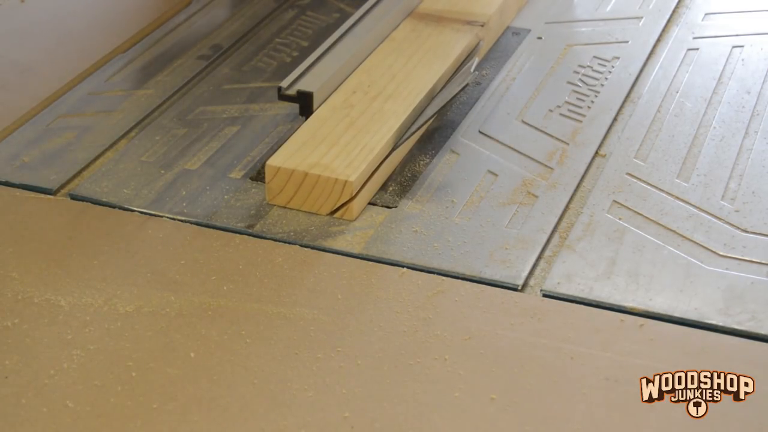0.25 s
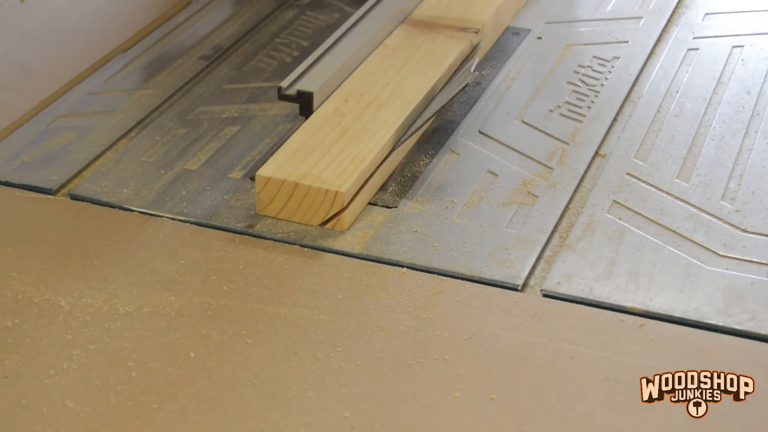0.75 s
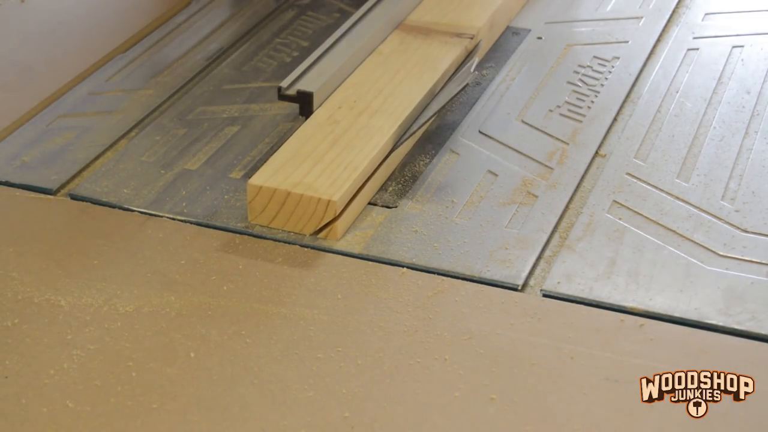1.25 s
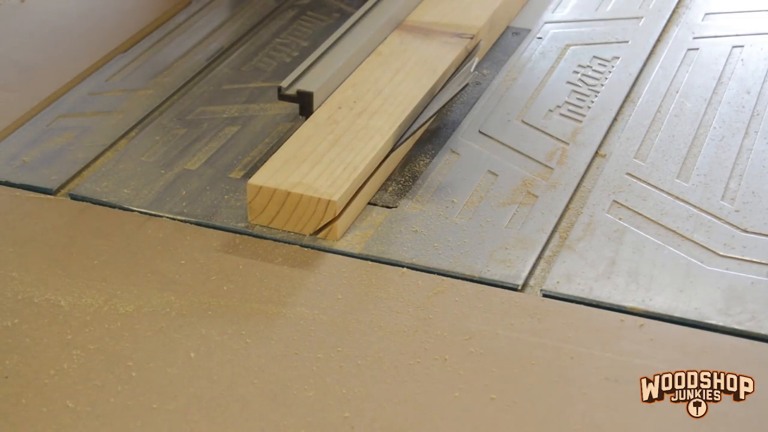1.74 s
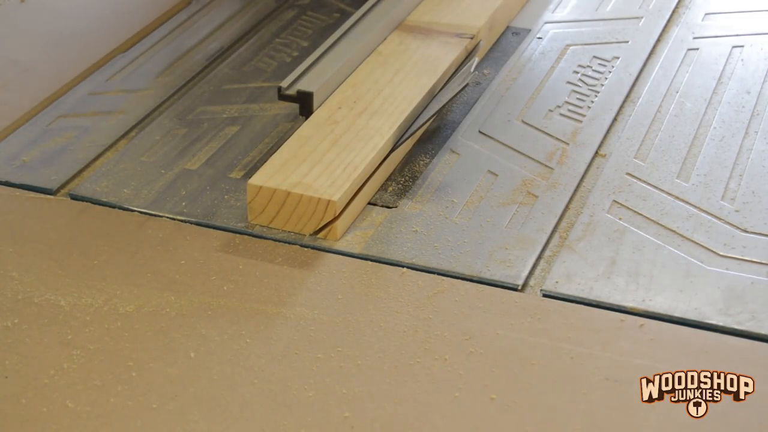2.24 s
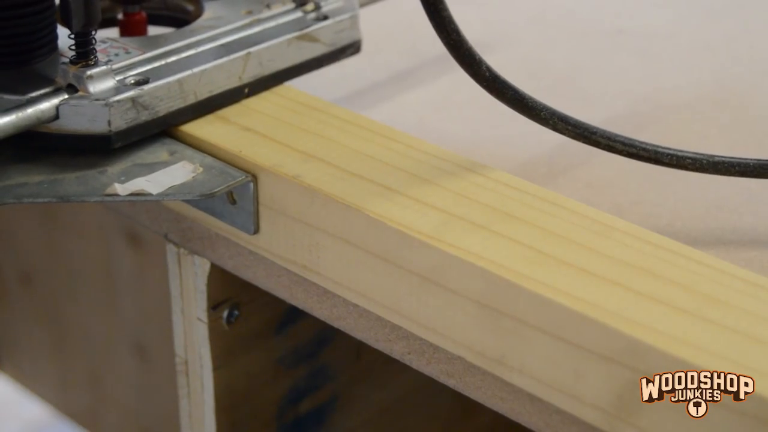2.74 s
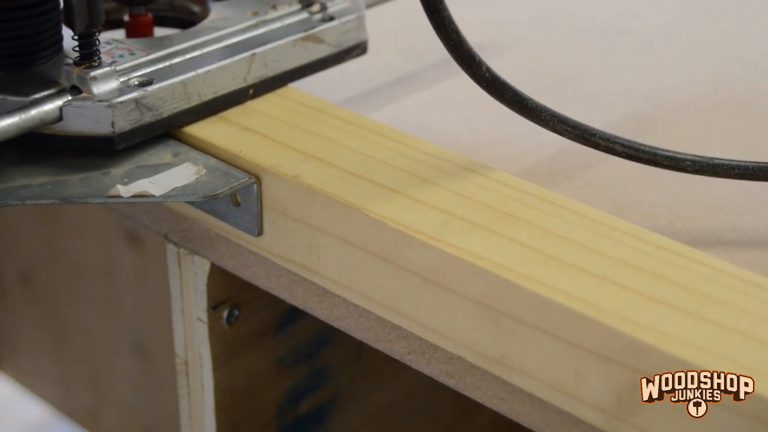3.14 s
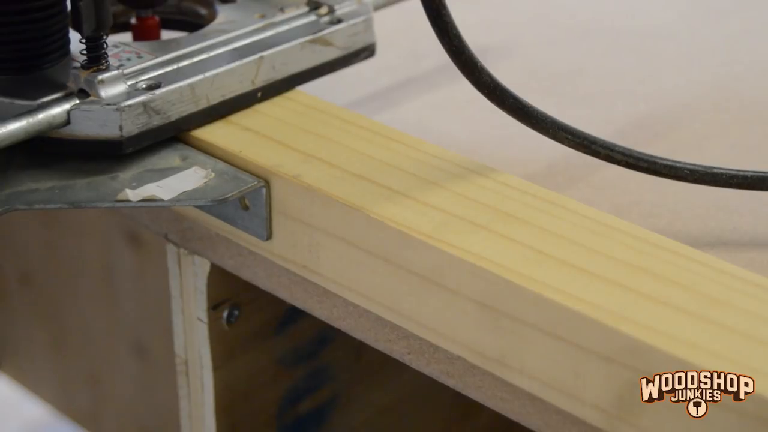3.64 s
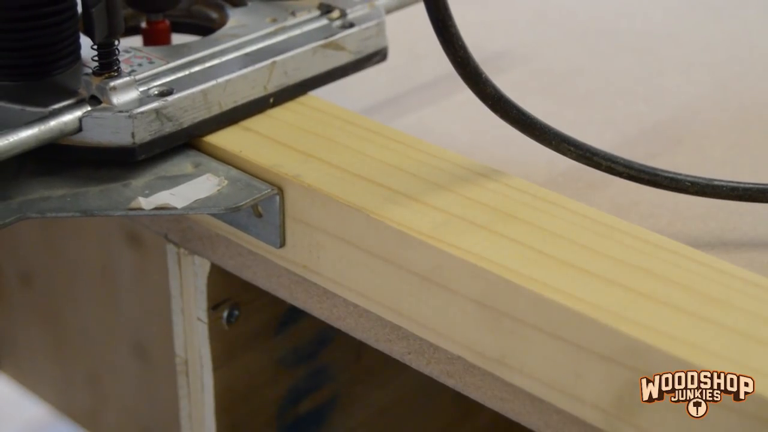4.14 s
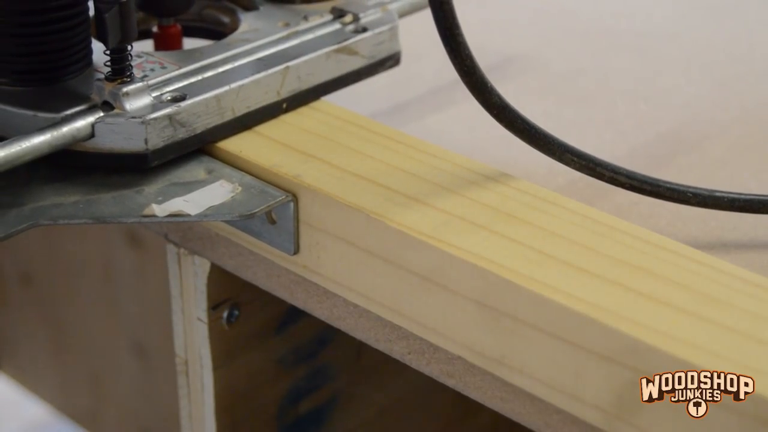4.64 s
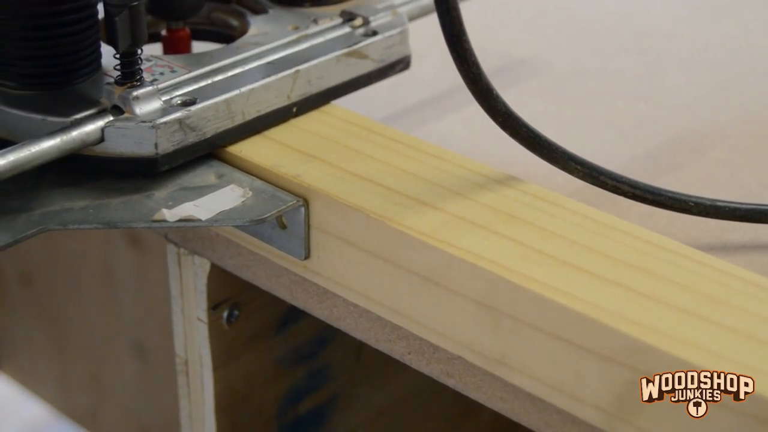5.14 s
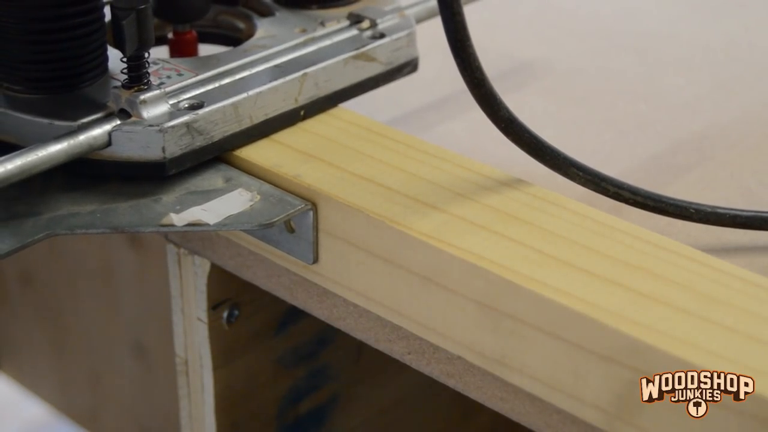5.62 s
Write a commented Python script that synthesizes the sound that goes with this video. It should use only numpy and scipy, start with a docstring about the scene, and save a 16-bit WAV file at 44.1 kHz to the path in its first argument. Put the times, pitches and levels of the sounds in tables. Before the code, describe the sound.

Close, harsh table-saw cutting noise rises in pitch, then cuts to a coasting router that kicks up, sags and climbs to a steady whine.

```python
"""Workshop, close by, mono: a table saw rips a pine board and speeds up as the cut ends; a quick
crossfade leads to a hand router that coasts, is kicked up, sags, then climbs to full speed.
Saw: tooth whine, blade and motor orders and rings over rumble, cutting rush, dust and grit.
Router: shaft orders, surge growl and housing tones over body rumble, fan air and brush hiss."""
import sys
import numpy as np
from scipy import signal
from scipy.fft import rfft, irfft
from scipy.io import wavfile
from scipy.ndimage import uniform_filter1d

SR = 44100
rng = np.random.default_rng(int(sys.argv[2]) if len(sys.argv) > 2 else 0)


def generate_wav(signal):
    """Clip the signal to [-1, 1] and save it as 16-bit WAV at the path in sys.argv[1]."""
    frames = np.transpose(np.atleast_2d(signal))
    scaled = np.clip(frames, -1, 1) * 32767
    pcm = np.round(scaled).astype(np.int16)
    wavfile.write(sys.argv[1], SR, pcm)


N = 259308
T = np.arange(N) / SR

EDIT_S = 2.318  # saw gives way to router
TOOTH_COUNT = 40
CUT_ENDS_S = 1.5  # blade is out of the board
HOUSING_HZ = 2190  # router housing resonance
TOP_HZ = 15760

# router power comes on: (start [s], rise [s], hold [s], fall [s], strength [0-1])
POWER_SURGES = [(2.5, 0.036, 0.1, 0.24, 0.8), (3.0, 0.073, 0.046, 0.43, 0.51)]
POWER_ON_S = POWER_SURGES[0][0]


def undb(db):
    """Decibels to gain."""
    return 10 ** (np.asarray(db) / 20)


def columns(table):
    """Each column of a curve table, interpolated to one value per sample."""
    time_s, *cols = np.transpose(table)
    return [np.interp(T, time_s, col) for col in cols]


def walk(rate_hz):
    """Random levels held 1 / rate_hz s and slewed twice; spread near 1."""
    k = int(SR / rate_hz)
    steps = np.repeat(rng.standard_normal(N // k + 1), k)
    return 1.33 * uniform_filter1d(uniform_filter1d(steps, k), k)[:N]


def swell(peak_s, rise_s, fall_s, hold_s=0):
    """Linear 0 to 1 to 0, reaching 1 at peak_s and holding for hold_s."""
    hold_end_s = peak_s + hold_s
    return np.interp(T, [peak_s - rise_s, peak_s, hold_end_s + 1e-4, hold_end_s + fall_s], [0, 1, 1, 0])


def noise(shape, ripple_db=0):
    """Noise of rms 1 with a (Hz, dB) colour; the room adds a fixed fine ripple over frequency."""
    shape_hz, shape_db = np.transpose(shape)
    bin_hz = np.maximum(np.fft.rfftfreq(N, 1 / SR), 1)
    steps = np.repeat(rng.standard_normal(len(bin_hz) // 400 + 1), 400)
    ripple = uniform_filter1d(steps, 400)[:len(bin_hz)]
    colour_db = np.interp(np.log(bin_hz), np.log(shape_hz), shape_db) + ripple_db * ripple
    x = irfft(rfft(rng.standard_normal(N)) * undb(colour_db), N)
    return x / np.std(x)


def turns(hz):
    """Shaft angle in radians, the running sum of its speed."""
    return 2 * np.pi * np.cumsum(hz) / SR


def tone(angle, db, waver_db, rate_hz):
    """Sine partial of nominal rms db; one random walk wavers its level and, time-shifted, its phase."""
    wander = waver_db * walk(rate_hz)
    return np.sqrt(2) * undb(db + wander) * np.sin(angle + np.roll(wander, N // 3) / 5)


def saw_speed():
    """Tooth rate in Hz and whine level in dB: the blade speeds up as the load goes."""
    # saw blade: (time [s], tooth rate [Hz], tooth whine [dB])
    blade_speed = [(0, 2595, -33.5), (.35, 2595, -35), (.55, 2593, -38), (.7, 2592, -34), (.9, 2589, -36.5),
                   (1.1, 2592, -30.5), (1.2, 2598, -32), (1.4, 2643, -35), (1.52, 2683, -42),
                   (1.6, 2699, -39), (1.7, 2704, -35.5), (1.82, 2749, -47.5), (2.0, 2792, -41.5),
                   (2.31, 2839, -38.5)]
    return columns(blade_speed)


def saw_rumble(stages_s):
    """Low-frequency noise, lifted where the board thuds on the table."""
    # noise colour: (frequency [Hz], density [dB per Hz])
    rumble_shape = [(15, -67), (25, -50), (54, -37), (97, -14), (124, -0.5), (188, 2), (227, -5),
                    (322, -5.5), (500, -4), (650, -43), (1100, -120)]
    # board thuds: (time [s], lift over the rumble [dB])
    thuds = [(.5, 3.5), (1.0, 8.2), (1.36, 5.6), (1.63, 5)]
    thud_s = 0.16
    level_db = np.interp(T, stages_s, [-47.5, -53.5, -53.5, -52.5])
    level_db = level_db + sum(lift_db * swell(s, thud_s, thud_s) for s, lift_db in thuds)
    return undb(level_db) * noise(rumble_shape)


def saw_spray(stages_s, blade):
    """Cutting rush, dust hiss and grit as coloured noise, throbbed slightly once a turn by blade wobble."""
    # noise colours: (frequency [Hz], density [dB per Hz])
    rush_shape = [(120, -38), (200, -19), (274, -8), (315, -5), (504, -7), (616, -1.5), (1490, -4.5),
                  (1840, -3.5), (2010, -4.5), (2670, 0), (3030, -3.5), (3750, -5.5), (4510, -9), (5060, -4),
                  (6000, -29), (7800, -39), (13200, -120)]
    dust_shape = [(2060, -22), (3500, -1.5), (3750, -2.5), (4490, -4.5), (5080, 1), (5900, -4), (7920, -3),
                  (9280, -1.5), (10700, -6), (11500, -17.5), (15000, -33), (22000, -120)]
    grit_shape = [(6180, -32), (10500, 1), (11100, -4), (11900, -6), (12300, -14), (15600, -24)]
    # free blade brushes the wood: (peak [s], rise [s], hold [s], fall [s], dust lift [dB])
    brushes = [(1.64, .04, .08, .09, 6), (2.04, .08, .02, .1, 2.5), (2.22, .08, .02, .08, 2)]
    rush_share, grit_share = .55, 1.1  # of the dust lift in dB
    rush_db = np.interp(T, stages_s, [-35, -34.5, -34.5, -35.5])
    dust_db = np.interp(T, stages_s, [-32.5, -35, -35, -33])
    grit_db = np.interp(T, stages_s, [-50, -53.5, -53.5, -45])
    brush_db = sum(lift_db * swell(s, rise, fall, hold) for s, rise, hold, fall, lift_db in brushes)
    rush = undb(rush_db + rush_share * brush_db + .5 * walk(11.25)) * noise(rush_shape, 0.47)
    puff_db = .6 * walk(9)  # dust and grit fly in the same puffs
    dust = undb(dust_db + brush_db + puff_db) * noise(dust_shape, 1.0)
    grit = undb(grit_db + grit_share * brush_db + puff_db) * noise(grit_shape, .8)
    throb = np.sin(blade)
    return rush * (1 + 0.041 * throb) + (dust + grit) * (1 + 0.03 * throb)


def leaving_wood(base_db, peak_s, rise_s, hold_s, fall_s, lift_db):
    """Level in dB that swells as the blade leaves the wood."""
    return base_db + lift_db * swell(peak_s, rise_s, fall_s, hold_s)


def out_of_wood():
    """0 in the board to 1 out of it."""
    return np.interp(T, [CUT_ENDS_S - .25, CUT_ENDS_S], [0, 1])


def saw_orders(blade, free):
    """Lines at multiples of the blade turn and of the geared motor turn."""
    # blade orders: (multiple of blade turn, cutting [dB], running free [dB])
    blade_orders = [(2, -59.5, -61), (3, -51, -58), (20, -55, -49), (25, -51, -53), (29, -51, -68),
                    (56, -54, -47), (59, -46, -64), (97.5, -49, -69), (139, -62, -55), (182, -61, -66),
                    (240, -68, -85)]
    # motor orders: (multiple of motor turn, loaded [dB], running free [dB])
    armature_orders = [(1, -51.5, -43.5), (9, -50.5, -46), (12, -45.5, -47)]
    gear = 4.79  # motor turns per blade turn
    wobble_db = -62.5 + (-56 + 62.5) * out_of_wood() + 6 * swell(1.5, .15, .2)
    out = tone(blade, wobble_db, 0.94, 7.7)
    for k, cut_db, free_db in blade_orders:
        out = out + tone(round(k) * blade, cut_db + (free_db - cut_db) * free, 2.7, 14)
    for k, load_db, free_db in armature_orders:
        out = out + tone(round(k) * gear * blade, load_db + (free_db - load_db) * free, 0.83, 17)
    return out


def saw_offcut(blade):
    """Each expansion slot flicks the loose offcut: a comb at four times the blade turn."""
    slot_count = 4
    rub_db = leaving_wood(-62, 1.63, .12, .09, .08, 19)
    return sum(tone(k * slot_count * blade, rub_db - 3.0 * abs(k - 8), 3.9, 14) for k in range(4, 14))


def saw_rings():
    """Two rings of the blade plate that swell as it leaves the wood; the upper one glides up."""
    ring_hz, ring_free_hz, plate_hz = 3232, 3290, 2706
    peak_s, hold_s, fall_s = 1.44, .145, .012
    ring_db = leaving_wood(-48, peak_s, .15, hold_s, fall_s, 12)
    ring_db = ring_db - 7 * (T > peak_s + hold_s + fall_s)  # damped afterwards
    low_ring_db = leaving_wood(-65, 1.7, .35, .09, .05, 24)
    ring = tone(turns(ring_hz + (ring_free_hz - ring_hz) * out_of_wood()), ring_db, 1.5, 30)
    return ring + tone(2 * np.pi * plate_hz * T, low_ring_db, 2.8, 15)


def saw_whine(blade, whine_db, free):
    """Five partials of the tooth rate, each with sidebands at whole blade turns from unequal teeth."""
    # whine partials: (time [s], 2nd level [dB], 3rd level [dB], 4th level [dB])
    upper = [(0, -41, -47, -46), (.2, -41, -39, -49), (.3, -39, -45, -48), (.4, -40.5, -40, -42.5),
             (.5, -41, -35.5, -47), (.7, -46, -36.5, -46), (.8, -48, -45, -42), (.9, -44, -50, -49),
             (1.0, -43, -55, -46), (1.12, -41.5, -48, -38), (1.2, -41.5, -42, -41), (1.35, -44, -50, -51),
             (1.5, -42, -51, -53), (1.6, -49, -50, -51), (1.7, -42, -48, -51), (1.87, -45, -43, -53),
             (2.0, -41, -42, -49.5), (2.3, -41, -43, -50)]
    # unequal teeth: (offset from the tooth rate [blade turns], level re partial [dB], odd partials 1 dB less)
    uneven = [(-2, -18), (-1, -8.5), (1, -16), (2, -17)]
    fifth_db = -59 + (-66 + 59) * free
    out = 0
    for k, db in enumerate([whine_db, *columns(upper), fifth_db], 1):
        out = out + tone(k * TOOTH_COUNT * blade, db, 1.1, 40)
        for side, side_db in uneven:
            out = out + tone((k * TOOTH_COUNT + round(side)) * blade, db + side_db - (k % 2), 4, 30)
    return out


def saw():
    """Tooth whine, shaft orders, offcut comb and plate rings over rumble and spray."""
    tooth_hz, whine_db = saw_speed()
    blade = turns(tooth_hz / TOOTH_COUNT)
    free = np.clip((tooth_hz - 2600) / 200, 0, 1)  # motor speeds up and sings once unloaded
    # blade starts to leave the board, cut runs out (two points), running free
    stages_s = [0.93, CUT_ENDS_S - .1, CUT_ENDS_S + .08, CUT_ENDS_S + 0.11]
    noises = saw_rumble(stages_s) + saw_spray(stages_s, blade)
    lines = saw_orders(blade, free) + saw_offcut(blade) + saw_rings()
    return noises + lines + saw_whine(blade, whine_db, free)


def router_speed():
    """Shaft speed in Hz: a curve, then a run-up whose gap to full speed closes as two decays; and the gap."""
    # shaft before the run-up: (time [s], speed [Hz])
    shaft_speed = [(2.32, 132), (2.41, 125), (2.51, 118.5), (2.535, 180), (2.595, 278), (2.635, 312),
                   (2.67, 330), (2.71, 336), (2.86, 313), (3.03, 295.8)]
    # run-up: (gap to full speed [Hz], time constant [s])
    run_up = [(62, .11), (120.3, .38)]
    full_hz = 478.1
    since_s = np.maximum(T - shaft_speed[-1][0], 0)
    climb_hz = full_hz - sum(gap_hz * np.exp(-since_s / tau_s) for gap_hz, tau_s in run_up)
    hz = np.where(since_s > 0, climb_hz, columns(shaft_speed)[0])
    return hz, full_hz - hz


def speed_law(hz, levels_db, lift_db):
    """Level in dB from levels at three shaft speeds, lifted by lift_db at a surge of 1."""
    surge = sum(size * swell(s + rise, rise, fall, hold) for s, rise, hold, fall, size in POWER_SURGES)
    return np.interp(hz, (125, 300, 478), levels_db) + lift_db * surge


def router_noise(hz, shaft):
    """Body rumble, fan air and brush hiss follow shaft speed and surge; the hiss throbs once a turn."""
    # noise colours: (frequency [Hz], density [dB per Hz])
    body_shape = [(15, -69), (25, -41), (59, -11), (92, -10), (177, -7.5), (253, -16), (288, 2.5),
                  (420, -14), (550, -33), (920, -120)]
    fan_shape = [(150, -50), (250, -27), (418, -11), (456, -13), (498, -9), (708, -8), (822, -7),
                 (1020, -0.5), (1340, -4.5), (1560, 2), (1900, -2), (2540, -2.5), (2880, -6), (3750, -2),
                 (5000, -8.5), (6500, -43), (11000, -120)]
    brush_shape = [(50, -40), (150, -27), (1760, -26), (3000, -10), (3740, -5.5), (4570, -4), (5580, -1),
                   (6020, -1.5), (6450, 0), (7360, -3.5), (9240, -0.5), (11300, -5), (15600, -24.5)]
    body_db = speed_law(hz, (-61, -62.5, -70), 11)
    air_db = speed_law(hz, (-32.5, -33.5, -34), 4.5)
    hiss_db = speed_law(hz, (-36, -31, -29), 5)
    air = undb(air_db + 0.46 * walk(4.47)) * noise(fan_shape, 0.62)
    hiss = undb(hiss_db + 0.31 * walk(10)) * noise(brush_shape, 0.38)
    return undb(body_db) * noise(body_shape) + air + hiss * (1 + 0.085 * np.sin(shaft))


def router_rattle():
    """The jolt of the surge rattles the housing: noise around its resonance."""
    edge_s = .014
    rattle = noise([(1300, -30), (1600, -6), (HOUSING_HZ, 0), (2600, -5), (3000, -30)])
    return undb(-38) * swell(POWER_ON_S + edge_s, edge_s, edge_s, hold_s=.04) * rattle


def housing_db(line_hz):
    """Lift in dB of a line near the housing resonance."""
    width_hz, peak_db = 150, 8
    return peak_db / (1 + ((line_hz - HOUSING_HZ) / width_hz) ** 2)


def router_growl(hz, shaft):
    """Current-surge growl on the twelve armature slots and neighbours; it swells crossing the resonance."""
    # surge growl: (time [s], level [dB])
    growl = [(2.5, -65), (2.515, -37), (2.535, -34), (2.56, -34), (2.575, -50), (2.62, -44), (2.78, -46),
             (2.86, -55), (3.05, -52), (3.6, -70)]
    # growl orders: (multiple of shaft turn, level re growl [dB])
    surge_orders = [(9, -14), (10, -9), (11, -10), (12, 0), (13, -12), (24, -3)]
    growl_db, = columns(growl)
    out = 0
    for k, db in surge_orders:
        line = tone(round(k) * shaft, growl_db + db + housing_db(k * hz), 2, 80)
        out = out + (k * hz < TOP_HZ) * line
    return out


def router_winding(hz, shaft):
    """Other shaft orders, moving between slow and fast levels and fading at low speed."""
    # shaft orders: (multiple of shaft turn, at two thirds speed [dB], at full speed [dB])
    winding = [(2, -51.5, -57), (3, -60, -46), (4, -50, -47), (7, -58, -52), (9, -60, -55), (12, -58, -52),
               (15, -60, -57), (18, -58, -58), (20, -56, -52), (21, -58, -53), (24, -52, -50),
               (26, -62, -60), (27, -62, -58), (32, -53, -62), (48, -57, -70)]
    fast = np.clip((hz - 320) / 150, -1, 1)
    out = 0
    for k, slow_db, fast_db in winding:
        db = slow_db + (fast_db - slow_db) * np.maximum(fast, 0) + 15 * np.minimum(fast, 0)
        out = out + (k * hz < TOP_HZ) * tone(round(k) * shaft, db, 3.1, 18)
    return out


def router_tones(hz, shaft, gap_hz):
    """Unbalance hum, fan whine, bar tone, coasting whines and steady housing tones."""
    # unbalance hum: (time [s], level [dB])
    hum = [(2.32, -48), (2.49, -49), (2.52, -66), (2.61, -62), (2.66, -41), (2.79, -39), (2.84, -46),
           (2.95, -41), (3.0, -45), (3.025, -56), (3.05, -43), (3.2, -40), (3.32, -47), (3.4, -43),
           (3.55, -44), (3.69, -52), (3.76, -45), (4.0, -47), (4.12, -63), (4.24, -50), (4.8, -46),
           (5.88, -46)]
    # cooling-fan whine: (time [s], level before housing lift [dB])
    fan_whine = [(2.32, -46), (2.42, -42), (2.51, -48), (2.56, -43), (2.6, -42), (2.63, -50), (3.02, -51),
                 (3.15, -45), (3.4, -39), (3.5, -39), (3.62, -46), (3.76, -47), (3.83, -34.5), (3.92, -43),
                 (4.0, -36.5), (4.12, -36.5), (4.17, -45), (4.22, -34), (4.68, -35), (4.76, -41),
                 (5.3, -38.5), (5.88, -42)]
    # coasting, two close whines with faint overtones: (multiple of shaft turn, level re coast_db [dB])
    coast_orders = [(12, -9), (14, -1), (14.8, 0), (24, -14), (28, -15), (29.6, -12)]
    # steady housing tones: (frequency [Hz], level [dB])
    steady = [(3040, -49), (1825, -55), (8166, -53), (8054, -55)]
    coast_db, coast_fade_s = -39.5, .04
    (hum_db,), (fan_db,) = columns(hum), columns(fan_whine)
    bar_db = speed_law(hz, (-58, -50, -41.5), 9)
    coasting = np.clip((POWER_ON_S + 0.009 - T) / coast_fade_s, 0, 1)
    changing = (1 - coasting) * np.clip(gap_hz / 60, 0, 1)
    # powered, hum and fan flutter more until near full speed
    out = tone(shaft, hum_db, .5 + 2.5 * changing, 40)
    out = out + tone(8 * shaft, fan_db + housing_db(8 * hz), 1.3 + 2 * changing, 30)
    out = out + tone(16 * shaft, bar_db, 2, 12)
    out = out + coasting * sum(tone(k * shaft, coast_db + db, 1 + k / 20, 30) for k, db in coast_orders)
    settled = (1 - changing) ** 3 * (1 - coasting)
    return out + settled * sum(tone(2 * np.pi * line_hz * T, db, 3.4, 12) for line_hz, db in steady)


def router():
    """Shaft orders, growl and rattle over fan air and brush hiss, all but the rattle tied to one shaft."""
    hz, gap_hz = router_speed()
    shaft = turns(hz)
    background = router_noise(hz, shaft) + router_rattle()
    orders = router_winding(hz, shaft) + router_growl(hz, shaft)
    return background + orders + router_tones(hz, shaft, gap_hz)


def scene():
    """The saw, then a 13 ms equal-power crossfade to the router, alike in both channels."""
    second = np.clip((T - EDIT_S) / 0.013 + .5, 0, 1)
    mono = np.sqrt(1 - second) * saw() + np.sqrt(second) * router()
    return np.array([mono, mono])


def record(dry):
    """High-pass at 45 Hz drops the deepest bass; a steep low-pass cuts the top."""
    dry = signal.sosfilt(signal.butter(2, 45, "high", fs=SR, output="sos"), dry)
    return signal.sosfilt(signal.ellip(16, .2, 75, TOP_HZ, fs=SR, output="sos"), dry)


dry = scene()
out = record(dry)
generate_wav(out)
```